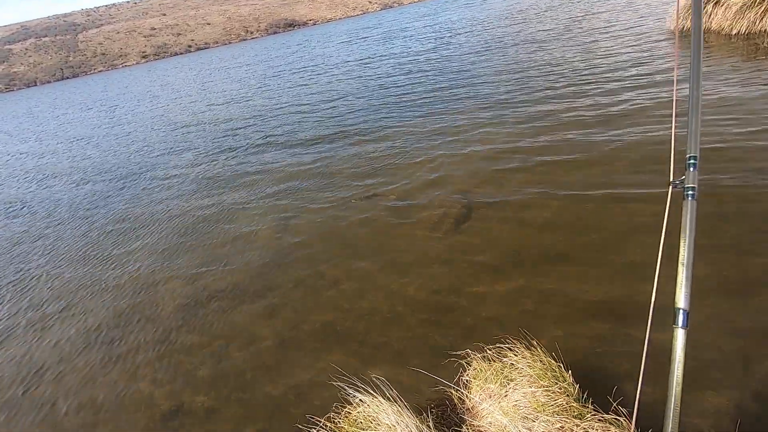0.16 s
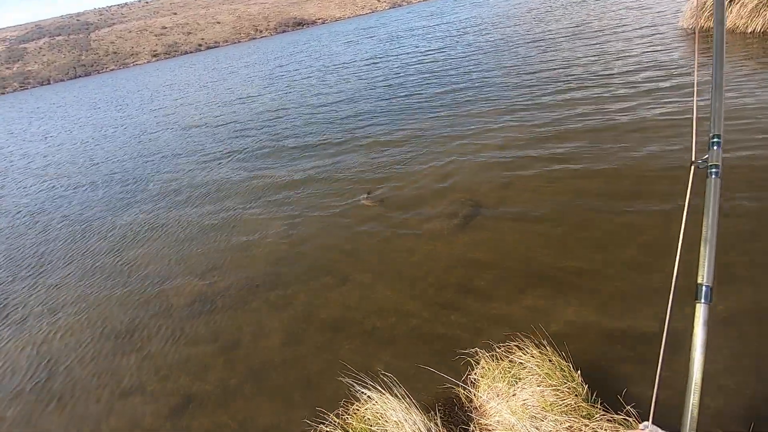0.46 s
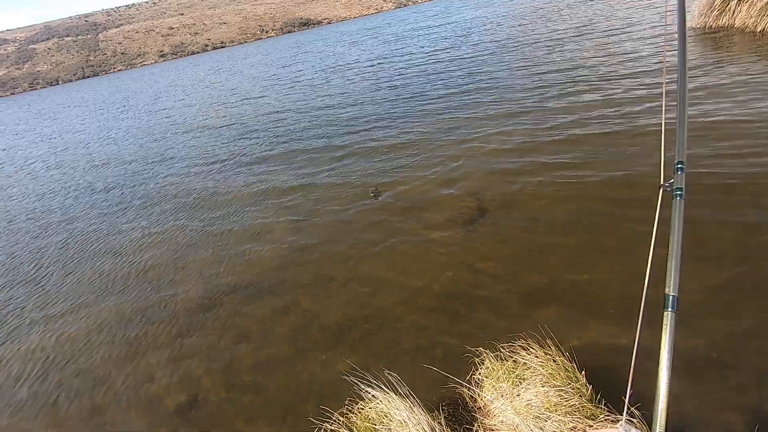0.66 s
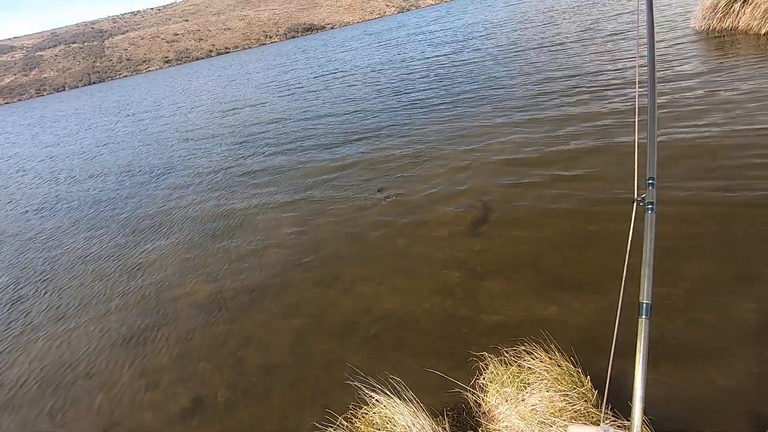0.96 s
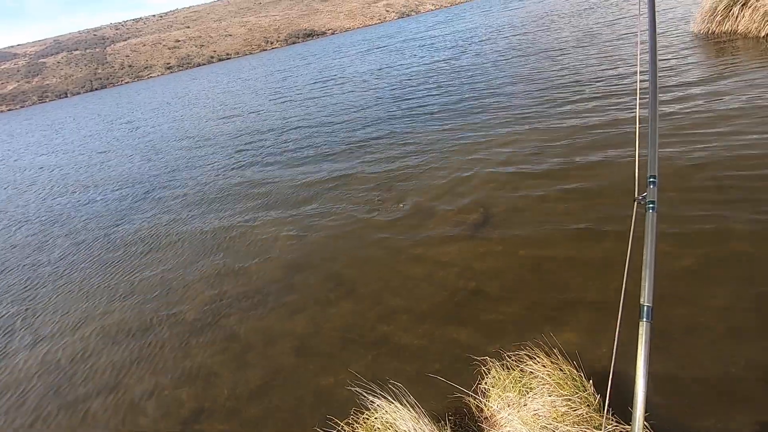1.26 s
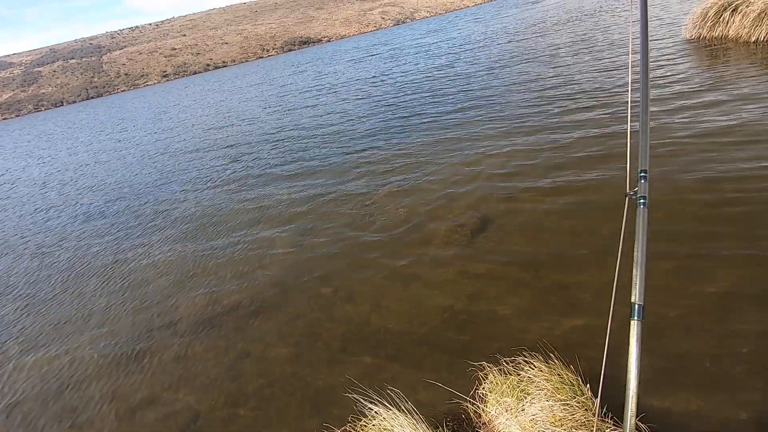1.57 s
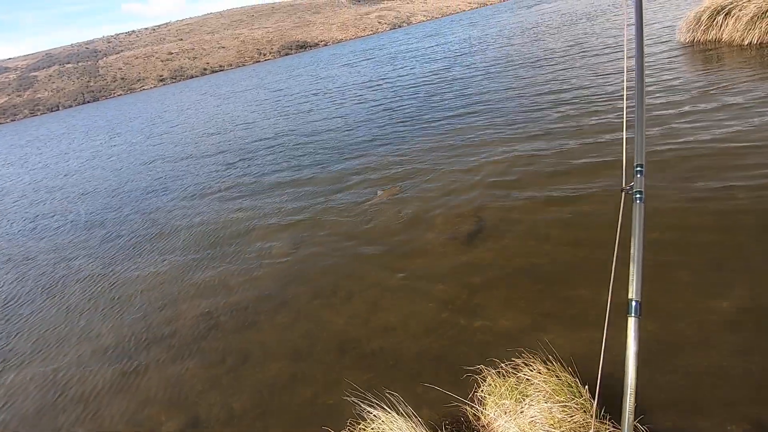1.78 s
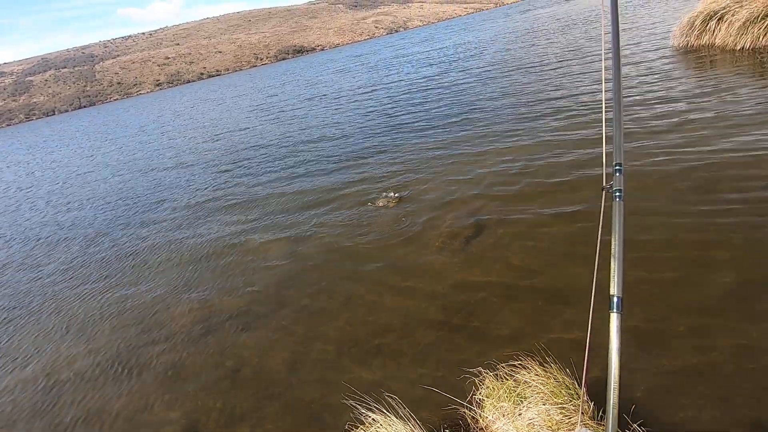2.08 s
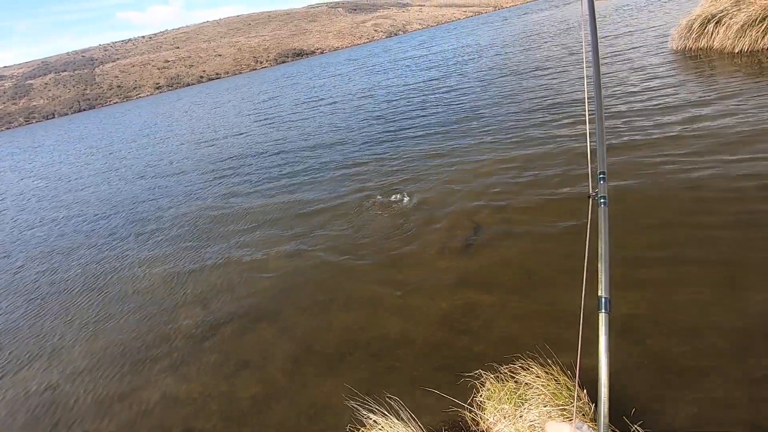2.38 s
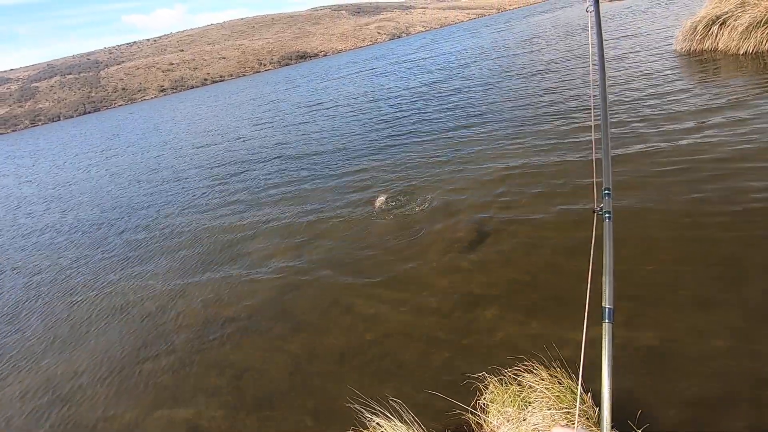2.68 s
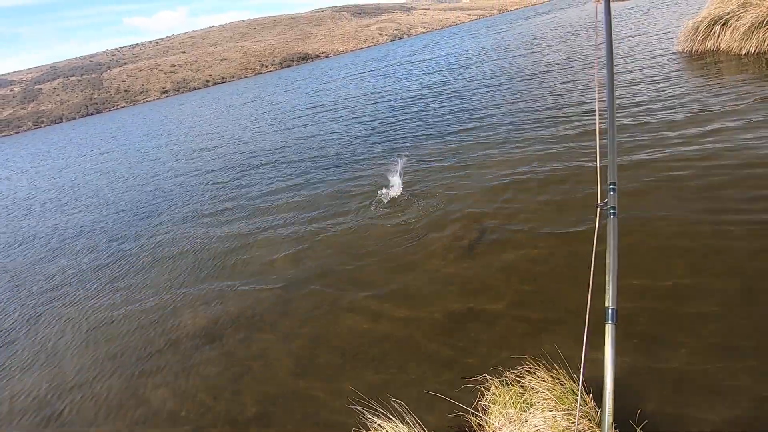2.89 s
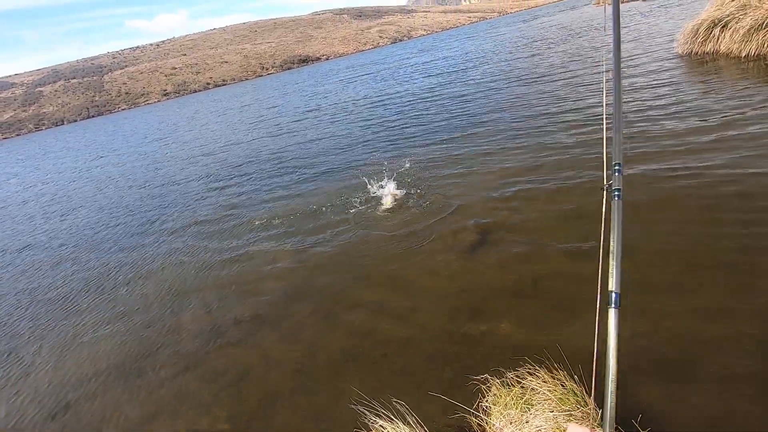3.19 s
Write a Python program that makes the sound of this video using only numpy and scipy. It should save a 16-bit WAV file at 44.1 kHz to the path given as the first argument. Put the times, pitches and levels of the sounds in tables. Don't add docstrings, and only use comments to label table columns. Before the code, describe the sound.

Low wind thumps on a small microphone at a lakeside, wet fishing line rustles and ticks briefly, then a fish some metres off slaps, bubbles and splashes, growing to vigorous thrashing until the cut.

```python
import sys
import numpy as np
from scipy import signal
from scipy.fft import rfft, irfft
from scipy.io import wavfile
from scipy.ndimage import uniform_filter1d

SR = 44100
rng = np.random.default_rng(int(sys.argv[2]) if len(sys.argv) > 2 else 0)


def waveform_to_disk(signal):
    frames = np.transpose(np.atleast_2d(signal))
    scaled = np.clip(frames, -1, 1) * 32767
    samples = np.round(scaled).astype(np.int16)
    wavfile.write(sys.argv[1], SR, samples)


def invert_db(level):
    return 10 ** (np.asarray(level, dtype=float) / 20)


N = 147294

# start_s, level_db
RIPPLE_LEVEL = [
    (0, -68),
    (.28, -70),
    (.56, -71.5),
]
# start_s, level_db
WIND_LEVEL = [(0, -37), (.2, -37.5), (.5, -44.5), (1.03, -41.5), (1.12, -35.5), (1.33, -35), (1.45, -41),
              (1.75, -41.5), (2.2, -40), (2.72, -43.5), (3.0, -44.5), (3.1, -35.5), (3.34, -36)]
# frequency_hz, level_db
WIND_SPECTRUM = [(12, -38.5), (22, 5), (70, -1), (190, -12.5), (300, -22.5), (550, -27.5), (2200, -62),
                 (5000, -120)]
# start_s, peak_db, pitch_hz
EDDIES = [(1.091, -25, 79), (1.161, -25.5, 187), (1.247, -24, 92), (1.31, -27, 100), (1.527, -26.5, 57.5),
          (0.149, -36, 62), (.239, -45.5, 155), (0.248, -43, 452), (1.09, -34, 186), (1.165, -30.5, 334),
          (1.31, -37.5, 453), (1.514, -38.5, 438), (1.516, -37, 230), (1.545, -34.5, 183),
          (1.551, -42, 400), (1.671, -43, 174), (1.847, -32, 94.4), (2.841, -39, 162), (3.07, -24, 136),
          (1.652, -30, 58), (1.727, -28, 134.5), (2.034, -29.5, 54), (2.228, -28.5, 62.6),
          (2.471, -32.5, 81), (2.661, -32.5, 172), (3.05, -25.5, 72.7), (3.221, -21.5, 172)]
# start_s, rustle_db
FIRST_PULL = [
    (.3, -99),
    (.37, -65.5),
    (.44, -69.5),
    (.58, -87),
]
# start_s, rustle_db
SECOND_PULL = [
    (.89, -81),
    (.94, -64),
    (1.0, -61),
    (1.045, -56.5),
    (1.1, -64.5),
    (1.22, -71),
    (1.42, -109.5),
]
# frequency_hz, level_db
RUSTLE_SPECTRUM = [(500, -18), (800, -4), (2000, -5.5), (3700, -8), (5700, -23.5), (7700, -19.5),
                   (9300, -24.5), (11000, -59.5)]
# start_s, peak_db, pitch_hz
LINE_TICKS = [(0.372, -54.5, 3310), (0.55, -69, 4120), (.902, -62.5, 1790), (0.924, -49.5, 603),
              (1.06, -46, 635), (0.939, -53, 2340), (0.955, -54, 1620), (1.014, -48.5, 7400),
              (1.034, -44.5, 2040), (1.059, -52, 3680), (1.203, -53.5, 850), (1.953, -57, 3250)]
# start_s, peak_db, pitch_hz
LANDINGS = [(.138, -62, 3600), (0.372, -56, 6500), (0.375, -54.5, 4800), (.966, -66, 6500),
            (1.012, -59, 6200), (1.031, -55, 5600), (1.039, -47, 7600), (1.053, -51, 7200),
            (1.144, -67, 5800), (1.195, -60, 3500), (1.376, -68, 6300), (1.387, -62, 7600),
            (1.414, -58, 3900), (2.019, -51, 7400), (2.023, -49, 6200), (2.039, -52, 7300),
            (2.041, -50, 4300), (2.078, -68, 4000), (2.106, -61, 5800), (2.115, -58, 8000),
            (2.116, -51, 3600), (2.211, -53, 6800), (2.234, -61, 3800), (2.254, -50, 7000),
            (2.341, -45.5, 7100), (2.425, -59, 6500), (2.46, -45, 3800), (2.492, -43, 3700),
            (2.507, -57, 5500), (2.554, -38.5, 3000), (2.599, -41.5, 1950), (2.68, -44, 5500),
            (2.78, -36, 2800), (2.867, -40, 7200), (2.955, -29, 3700), (2.966, -25.5, 3600),
            (3.006, -35.5, 3600), (3.03, -36, 6200), (3.048, -40, 7000), (3.087, -25, 3100),
            (3.269, -36, 3500), (3.276, -23, 3800), (3.298, -36, 7000)]
# start_s, bubbling_db, fine_spray_db
AGITATION = [
    (1.978, -48.5, -67),
    (2.06, -58.5, -71),
    (2.15, -54, -73),
    (2.38, -54.5, -58.5),
    (2.47, -59, -64.5),
    (2.62, -62, -56),
    (2.85, -59.5, -53.5),
    (3.1, -48, -48.5),
    (3.34, -47, -48.5),
]
# frequency_hz, level_db
SPRAY_SPECTRUM = [(280, -21.5), (480, -8), (3700, -12), (4600, -22), (5800, -28.5), (7600, -26.5),
                  (9300, -39.5), (11500, -58)]
# start_s, peak_db, pitch_hz
TRAPPED_BUBBLES = [(1.992, -29.5, 453), (1.994, -28.5, 771), (2.081, -36.5, 1740), (2.081, -47, 1060),
                   (2.105, -36, 915), (2.115, -41, 2560), (2.119, -37.5, 1343), (2.14, -43, 1100),
                   (2.212, -53, 3620), (2.212, -40.5, 1660), (2.274, -41, 2500), (2.291, -35.5, 1010),
                   (2.34, -37, 2850), (2.34, -36, 945), (2.359, -26.5, 2204), (2.377, -34.5, 1750),
                   (2.498, -40.5, 2340), (2.436, -34, 2010), (2.802, -37.5, 510), (2.901, -29.5, 3800),
                   (2.96, -30.5, 633), (2.974, -28, 3300), (3.093, -29.5, 1170), (3.121, -28.5, 1670),
                   (3.21, -21, 3560), (3.235, -26.5, 825), (3.273, -31, 1024), (3.333, -35, 1500),
                   (2.015, -41, 1010), (2.08, -38, 1000), (2.23, -41.5, 556), (2.376, -43.5, 810),
                   (2.055, -50.5, 2310), (2.126, -40, 1230), (2.161, -46, 1200), (2.221, -39.5, 1285),
                   (2.272, -40.5, 2030), (2.314, -38, 1605), (2.536, -44, 1160), (2.558, -40, 1660),
                   (2.69, -35.5, 3380), (2.777, -45.5, 1220), (2.837, -38.5, 1680), (2.871, -40, 1580),
                   (2.873, -41, 2720), (2.973, -41, 640), (3.08, -38, 960)]
# start_s, peak_db, start_hz, end_hz, length_s
AIR_POCKETS = [
    (2.359, -34.5, 265, 573, 0.015),
    (2.397, -38.5, 473, 850, 0.0069),
    (2.401, -34.5, 194, 226, 0.048),
    (2.505, -46.5, 642, 950, 0.026),
    (2.643, -39.5, 458, 887, 0.028),
    (2.898, -36.5, 488, 1156, 0.0219),
    (3.212, -28, 328, 497, 0.0387),
    (3.233, -30.5, 486, 814, 0.034),
]
# start_s, peak_db, burst_length_s, brightness_db
BODY_SLAPS = [(1.994, -14, 0.0079, -0.5), (2.011, -37, 0.0069, -15), (2.321, -22, 0.0069, 7.5),
              (2.359, -23.5, 0.028, 10.5), (2.4, -27, 0.012, -1), (2.683, -37.5, 0.017, 24),
              (2.832, -24.5, 0.02, 4), (2.874, -25.5, 0.017, 1.5), (2.895, -37.5, 0.012, 29),
              (2.955, -16.5, 0.036, 3), (2.979, -27, 0.012, 11.5), (2.994, -29.5, 0.029, 16.5),
              (3.076, -15.5, 0.03, 4), (3.093, -13.5, 0.028, 5), (3.111, -34, 0.017, 19),
              (3.204, -13.5, 0.036, 0), (3.259, -14.5, 0.034, -2), (3.269, -19, 0.014, -2),
              (3.297, -22, 0.0087, 14.5)]


def rms_one(x):
    return x / np.sqrt(np.mean(x ** 2) + 1e-20)


def level(rows, axis=1):
    times = [row[0] for row in rows]
    db = [row[axis] for row in rows]
    return invert_db(np.interp(np.arange(N) / SR, times, db, left=-120, right=-120))


def butterworth(x, order, hz, kind="band"):
    return signal.sosfilt(signal.butter(order, hz, kind, fs=SR, output="sos"), x)


def drift(rate):
    pole = np.exp(-80 * np.pi * rate / SR)
    noise = rng.standard_normal(N // 40 + 2002)
    slow = signal.lfilter([1], [1, -2 * pole, pole * pole], noise)[2000:]
    return np.interp(np.arange(N) / 40, np.arange(len(slow)), rms_one(slow))


def colour(x, spectrum, tilt=0):
    hz, db = np.transpose(spectrum)
    grid = np.log(np.maximum(np.fft.rfftfreq(8192, 1 / SR), 5))
    gain_db = np.interp(grid, np.log(hz), db) + tilt * (grid - np.log(2000))
    cepstrum = irfft(gain_db * np.log(10) / 20)
    cepstrum[1:4096] *= 2
    cepstrum[4097:] = 0
    response = irfft(np.exp(rfft(cepstrum)))
    return signal.fftconvolve(x, response / np.sqrt(np.sum(response ** 2)))[:N]


def patchy(x, low_hz, patchy_db, rate, count=8):
    out, shared = 0, drift(rate)
    for k in range(count):
        edges = [low_hz * 2 ** k, min(low_hz * 2 ** (k + 1), 20000)]
        flicker_db = patchy_db * (0.94 * shared + drift(rate * 1.16))
        out = out + butterworth(x, 2, edges) * invert_db(flicker_db) * (-1) ** k
    return rms_one(out)


def add(out, s, x):
    i = int(s * SR)
    out[i:i + len(x)] += x[:max(N - i, 0)]


def chirp(hz, end_hz, length, attack, fade_db):
    u = np.arange(max(int(length * SR * 1.5), 8)) / (length * SR)
    pitch = hz * (end_hz / hz) ** np.minimum(u, 1.2)
    rise = np.minimum(u / np.clip(attack, .01, 1), 1)
    end_taper = np.minimum((1.5 - u) * 4, 1)
    swell = rise * invert_db(-fade_db * u ** 2) * end_taper
    return swell * np.sin(2 * np.pi * np.cumsum(pitch) / SR)


def open_air():
    hiss = colour(rng.standard_normal(N), RUSTLE_SPECTRUM, tilt=2.5)
    return invert_db(-79) * patchy(hiss, 700, 1.2, 12, count=5)


def ripples():
    return level(RIPPLE_LEVEL) * rms_one(butterworth(rng.standard_normal(N), 2, (400, 1300)))


def wind():
    lump_db, lumps_per_s, split_hz = 1.3, 9, 392
    rumble = patchy(colour(rng.standard_normal(N), WIND_SPECTRUM), 13.3, lump_db, lumps_per_s)
    low = butterworth(rumble, 2, split_hz, "low")
    top = butterworth(rumble, 2, split_hz, "high")
    gusts = level(WIND_LEVEL)
    out = gusts * low - invert_db(-23.5) * gusts ** .45 * top

    eddy_s, rough_db = 0.039, -14
    rough = rms_one(butterworth(rng.standard_normal(N), 4, [90, 254.5]))
    swell = np.zeros(N)
    for s, db, hz in EDDIES:
        length = eddy_s * (70 / hz) ** 0.64
        add(out, s, invert_db(db + 1.5) * chirp(hz * 0.81, hz * 1.22, length, 0.21, 20))
        add(swell, s, invert_db(db + rough_db) * np.hanning(int(eddy_s * 0.93 * SR)))
    return out + swell * rough


def line():
    pull = level(FIRST_PULL) + level(SECOND_PULL)
    body, top = rng.standard_normal((2, N))
    out = pull * patchy(colour(body, RUSTLE_SPECTRUM, tilt=-2.5), 500, 3, 35, count=4)
    out += pull ** 1.85 * invert_db(43) * rms_one(colour(top, RUSTLE_SPECTRUM, tilt=6.2))

    sizzle_s, sizzle_db, fade_db_per_s = 1.0, -74.5, 54
    since = np.arange(N) / SR - sizzle_s
    film = rms_one(butterworth(top, 3, (8000, 8280)))
    out += (since > 0) * invert_db(sizzle_db - fade_db_per_s * np.abs(since)) * film

    tick_s, crack_db = 0.01, -12
    cracks = np.zeros(N)
    for s, db, hz in LINE_TICKS:
        length = tick_s * min(2000 / hz, 1.2) ** 1.35
        add(out, s, invert_db(db) * chirp(hz, hz * 0.99, length, 0.092, 6.8))
        add(cracks, s, invert_db(db + crack_db) * rng.standard_normal(100) * invert_db(-.12 * np.arange(100)))
    return out + colour(cracks, RUSTLE_SPECTRUM, tilt=4.5)


def droplets():
    ring_s, snap_db, snap_s = .0018, -6, .003
    out, snaps = np.zeros((2, N))
    fade = invert_db(-20 * np.arange(300) / (snap_s * SR))
    for s, db, hz in LANDINGS:
        add(out, s, invert_db(db) * chirp(hz, hz * 1.006, ring_s * (4000 / hz) ** 0.66, 0.29, 16))
        add(snaps, s, invert_db(db + snap_db) * fade * rng.standard_normal(300))
    return out + colour(snaps, SPRAY_SPECTRUM, tilt=5.9)


def spray():
    wash = patchy(colour(rng.standard_normal(N), SPRAY_SPECTRUM, tilt=-7.5), 376, 1.7, 26, count=6)
    hiss = patchy(colour(rng.standard_normal(N), SPRAY_SPECTRUM, tilt=4.5), 636, 1.0, 24, count=5)
    count, drops_per_s, spread_db, cycles = 1400, 1000, 3.5, 5.5
    drops = np.zeros(N)
    for when, pitch, energy, glide, ring in rng.random((count, 5)):
        s = AGITATION[0][0] + when * count / drops_per_s
        hz = 600 * 15 ** (pitch ** 1.642)
        size_db = min(-spread_db * np.log(max(energy, 1e-3)), 11)
        length = cycles * (0.4 + 0.94 * ring ** 2) / hz
        if s * SR < N:
            drop = chirp(hz, hz * (0.716 + .5 * glide), length, 0.018, 4.3)
            add(drops, s, invert_db(size_db) * hz ** .5 * drop)
    patter = rms_one(colour(drops, SPRAY_SPECTRUM))
    bubbling = invert_db(-6.5) * wash + invert_db(-1) * patter
    return level(AGITATION) * bubbling + level(AGITATION, axis=2) * hiss


def bubbles():
    out = np.zeros(N)
    for s, db, hz in TRAPPED_BUBBLES:
        cycles = 8.9 * (hz / 1000) ** 0.46
        add(out, s, invert_db(db) * chirp(hz, hz * 0.94, cycles / hz, .08, 18.5))
    for s, db, hz, end_hz, length in AIR_POCKETS:
        add(out, s, invert_db(db) * chirp(hz, end_hz, length, 0.43, 8.5))
    return out


def slaps():
    attack_share, noise_db, crack_db, froth_db = 0.26, -12.5, -11.5, -14.5
    dull, bright, froth = np.zeros((3, N))
    t = np.arange(4000) / SR
    for s, db, length, bright_db in BODY_SLAPS:
        length = max(length, .001)
        shape = np.minimum(t / (attack_share * length), 1) * invert_db(-20 * t / length)
        grains = np.repeat(rng.exponential(1, (2, 100)), 40, axis=1) ** .5
        grit = rng.standard_normal((2, 4000)) * grains
        crack = invert_db(db + crack_db + 6.0) * (t == t[40])
        burst = invert_db(db + noise_db) * shape * grit + crack
        add(dull, s, burst[0] * invert_db(-bright_db))
        add(bright, s, burst[1] * invert_db(bright_db - 9.5))
        for when, pitch, glide in rng.random((7, 3)):
            hz = 700 * 6 ** pitch
            gain = invert_db(db + froth_db - 10 * when - abs(bright_db))
            bubble = chirp(hz, hz * (0.91 + 0.08 * glide), 9 / hz, 0.032, 40)
            add(froth, s + when * length * 1.1, gain * bubble)
    return colour(dull, SPRAY_SPECTRUM, tilt=-4.5) + colour(bright, SPRAY_SPECTRUM, tilt=2.8) + froth


def mist(fish):
    power = uniform_filter1d(np.diff(fish, prepend=0) ** 2, int(0.035 * SR))
    loud = np.sqrt(power + 1e-14)
    top = butterworth(rng.standard_normal(N) * invert_db(2 * drift(80)), 4, (10800, 14500))
    return invert_db(52) * loud * level(AGITATION, axis=2) ** 1.48 * top


def scene():
    background = open_air() + ripples() + wind()
    fish = spray() + bubbles() + slaps()
    return (background + line() + droplets() + fish + mist(fish))[None]


def band_limit(x):
    return signal.sosfilt(signal.butter(12, 15700, fs=SR, output="sos"), x)


def record(dry):
    return band_limit(dry)


dry = scene()
out = record(dry)
waveform_to_disk(out)
```